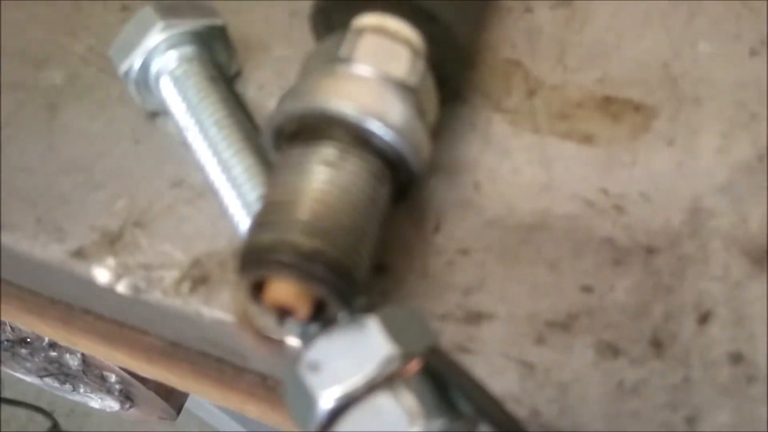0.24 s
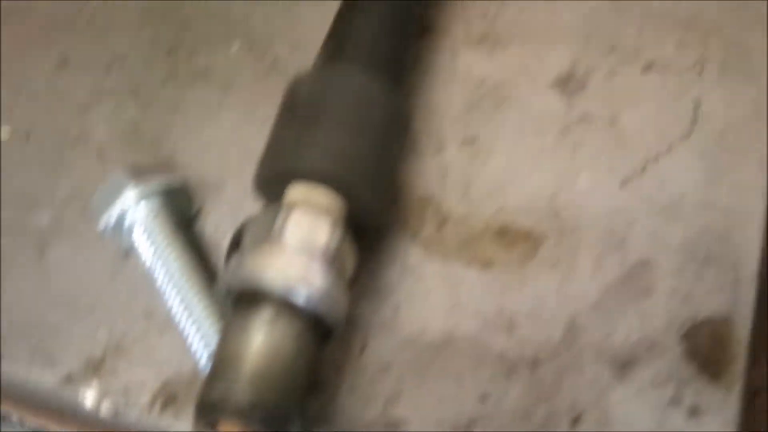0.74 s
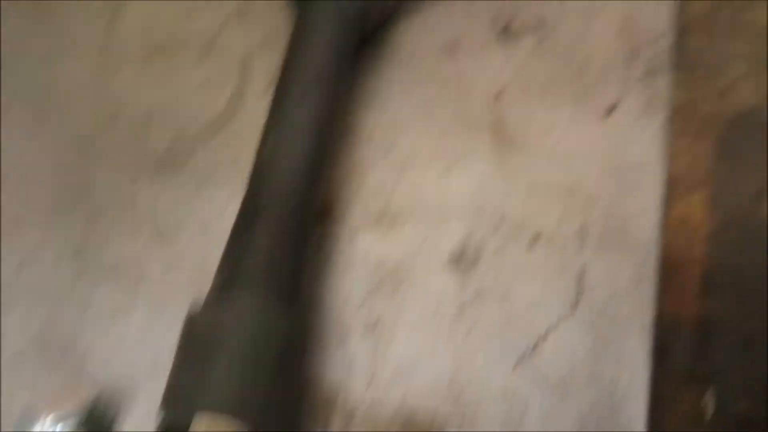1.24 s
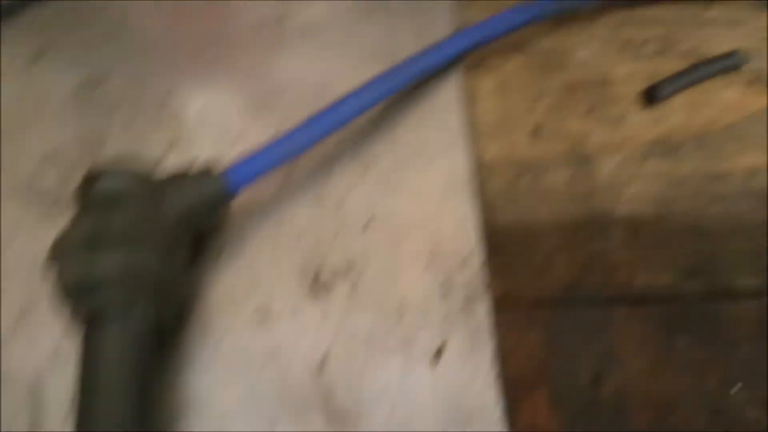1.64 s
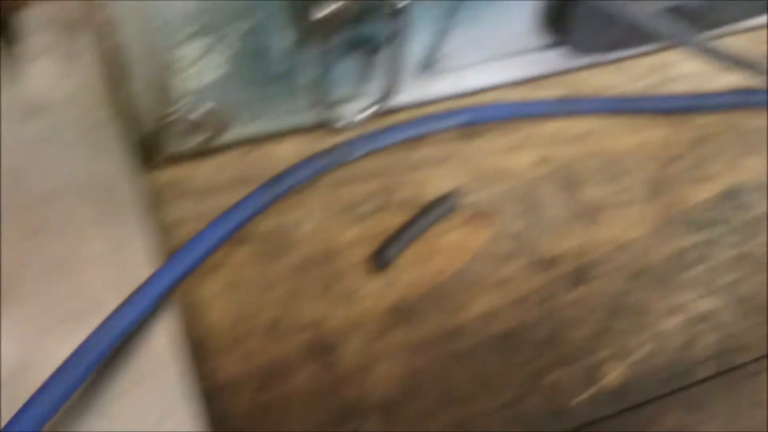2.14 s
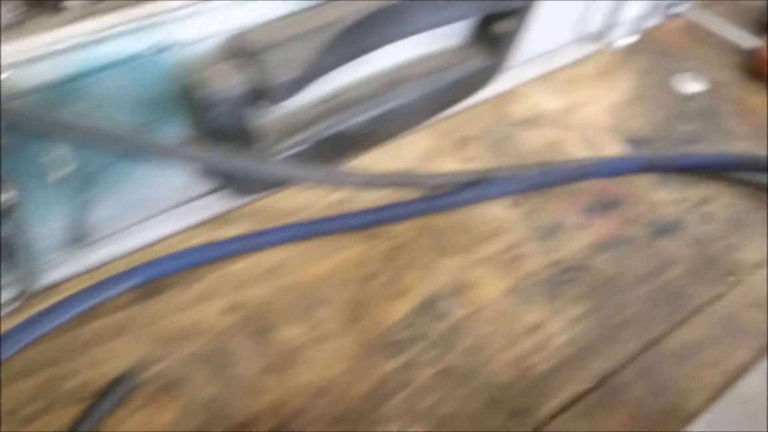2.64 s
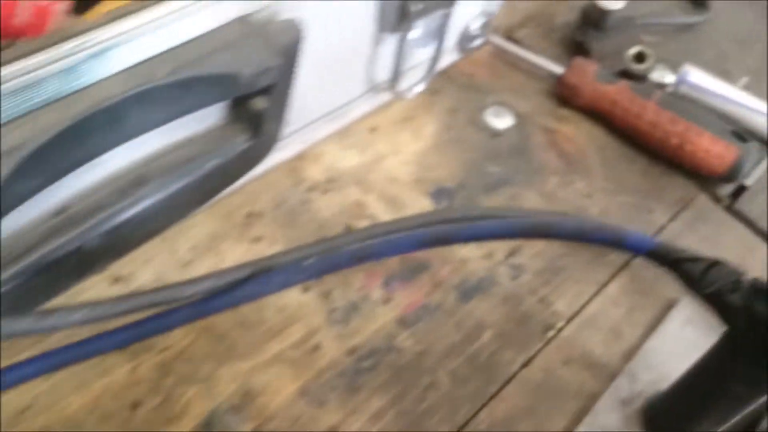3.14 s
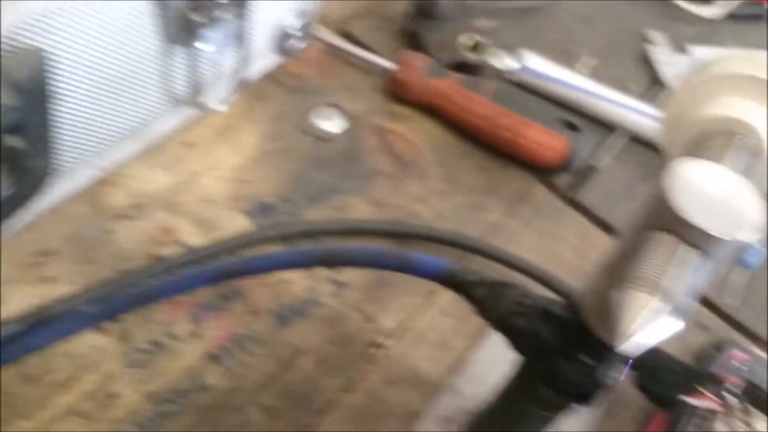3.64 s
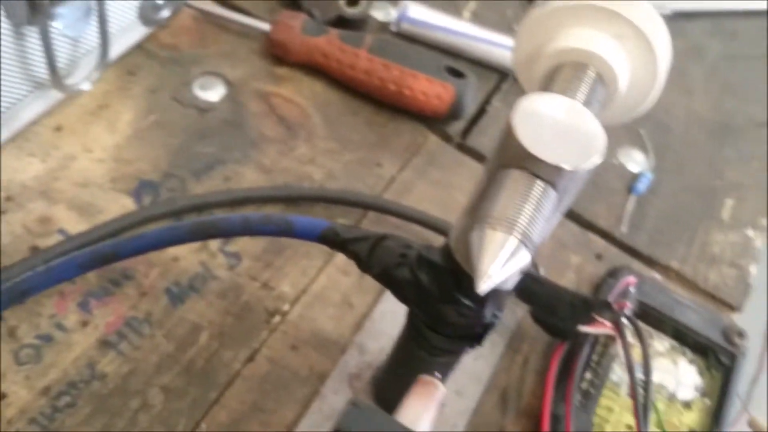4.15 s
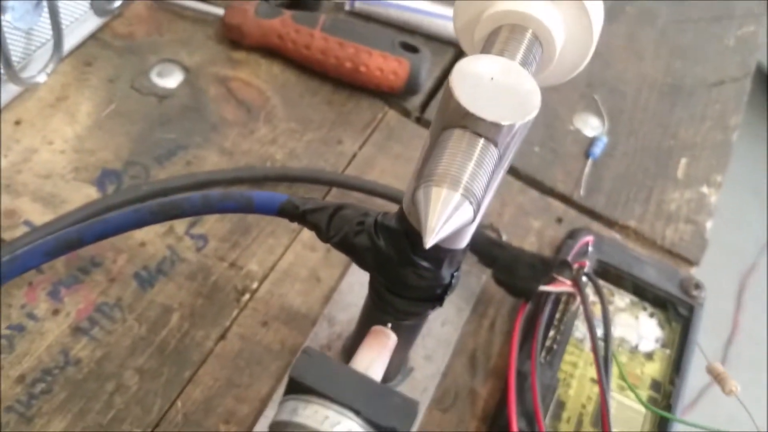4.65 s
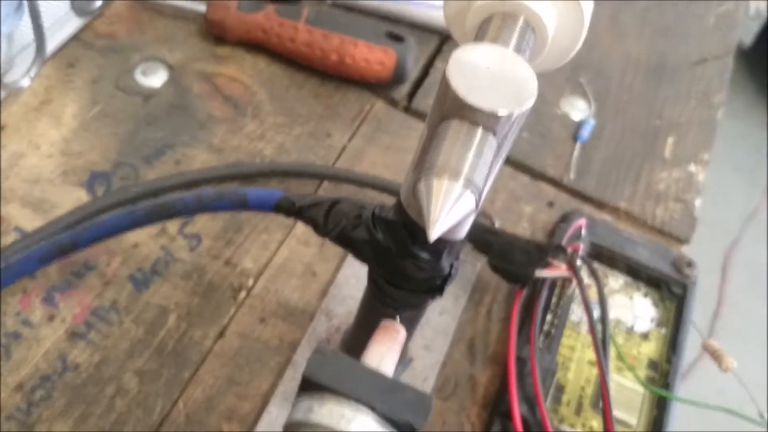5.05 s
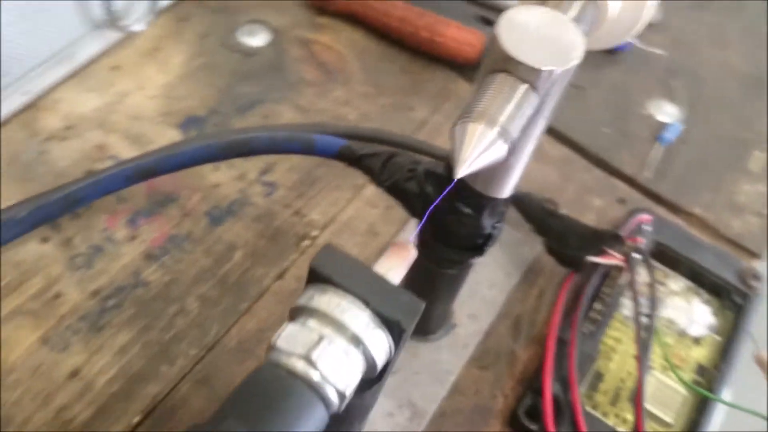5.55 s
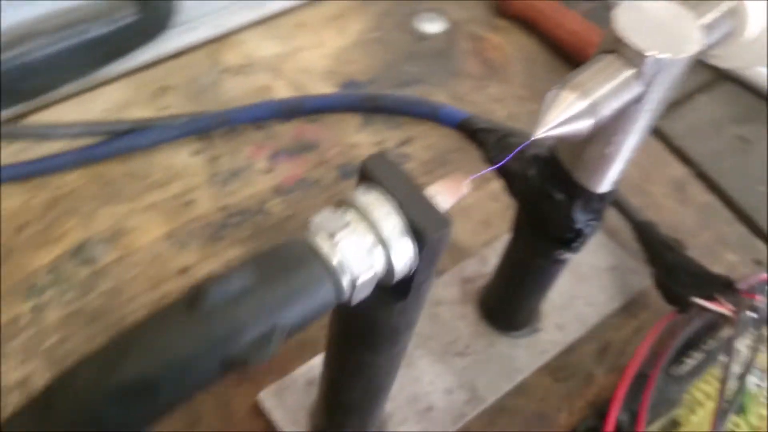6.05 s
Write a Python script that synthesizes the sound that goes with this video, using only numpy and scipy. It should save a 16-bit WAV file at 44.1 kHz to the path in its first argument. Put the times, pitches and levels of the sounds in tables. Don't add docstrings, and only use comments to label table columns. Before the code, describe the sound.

From 0 s an electric drill is already running at nearly constant speed: bright brush hiss, a soft midrange gearbox whir, low bench rumble and a very thin, high whine near 9.5 kHz. Over it, sharp electric sparks snap on a clock of about 26 a second, in short runs with skipped beats. Around 1.6 s the runs lengthen; the rumble swells briefly near 1.8 s as the hand shifts. Gear tones around 1.7 kHz and a faint chuck rattle surge irregularly, and the whine dips and swells, strong from 2.3 to 3.3 s. From 3.1 s the sparks are closer and harder, with a dense run from 3.7 to 4.1 s. Between 4.2 and 5.2 s only scattered snaps remain, exposing the drill. Dense cracking returns from 5.3 s, continuing with brief gaps to the cut-off at 6.3 s. Handheld stereo phone, tight bench echoes, clipped snaps, gritty treble.

```python
import sys
import numpy as np
from scipy import signal
from scipy.io import wavfile
from scipy.ndimage import uniform_filter1d, minimum_filter1d

SR = 44100
rng = np.random.default_rng(int(sys.argv[2]) if len(sys.argv) > 2 else 0)


def persist_wave(psi):
    counts = np.round(np.clip(psi, -1, 1) * 32767).astype(np.int16)
    wavfile.write(sys.argv[1], SR, np.atleast_2d(counts).T)


def decibels_to_gain(level_db):
    exponent = np.asarray(level_db, float) / 20
    return 10 ** exponent


N = 277389
TIME = np.arange(N) / SR

# time in seconds, commutator frequency in Hz.
MOTOR_SPEED = [(0, 9485), (0.7, 9462), (1.32, 9465), (1.99, 9441), (2.48, 9454), (2.7, 9466), (3.8, 9470),
               (4.25, 9491), (4.63, 9477), (5.46, 9484), (5.65, 9475), (5.96, 9483), (6.29, 9479)]
# time in seconds, drill level in dB, brush hiss left minus right in dB,
# spark left minus right in dB.
PHONE_PATH = [(0.0, -35.5, 8.5, 3), (0.31, -35.5, 9, 2), (0.81, -35, 6.5, 4), (1.33, -36, 11.5, 3.5),
              (1.58, -33, 7, 4), (2.01, -33.5, 9, 1), (2.26, -35, 15, 4), (2.61, -37, 9, 6),
              (2.94, -35.5, 11.5, 0), (3.28, -38, 8, 7.5), (3.54, -40, 13.5, 2), (3.85, -36.5, 10, 4),
              (4.1, -38, 9.5, 7), (4.62, -37, 10.5, 10), (4.92, -41.5, 10.5, 4), (5.54, -36, 10, 10),
              (5.9, -39.5, 5, 11), (6.17, -37, 4, 9)]

# frequency in Hz, density in dB.
GEARBOX_ROAR = [(300, -29), (500, -5), (750, 3.5), (1100, 5.5), (1350, 2), (1700, 6), (2050, -2.5),
                (2600, -21), (4000, -53.5)]
BRUSH_HISS = [(1500, -10), (2600, -2), (4300, -2), (5000, -2.5), (7000, 0), (8000, 1), (10500, 2),
              (12000, -7.5), (13000, -3), (15600, -15), (16000, -74)]
BENCH_RUMBLE = [(30, -15), (60, -5), (130, -13.5), (280, 0), (420, 0.5), (600, -5.5), (900, -16.5)]
SPARK_SNAP = [(300, -30), (1000, -14), (2500, -10), (5500, -8), (7500, -1), (10500, 2), (12500, -2),
              (15500, -3), (16800, -6), (18000, -40)]
# frequency in Hz, density in dB.
BENCH_CRACK = [
    [(800, -22), (1500, -6), (2200, 1.5), (3200, -5), (5000, -4), (6500, -20), (9000, -40)],
    [(800, -25), (2000, -12), (2900, -12), (3700, -4), (5200, 0), (6200, -5), (9000, -40)],
]

# frequency in Hz, level difference in dB.
PORT_LEVEL = [(180, 0), (280, 1.8), (700, 0), (1200, -3.5), (1800, -6.5), (2600, 0), (4300, 1.5),
              (5700, 4.5), (6700, 10), (8500, 8), (10800, 7.5), (12300, 0), (13300, -3), (15500, -8)]
# frequency in Hz, likeness from 0 to 1.
PORT_COHERENCE = [(70, 0.71), (170, 1), (800, 0.8), (1500, 0.19), (2500, 0.074), (5000, 0.15),
                  (15000, 0.044)]
# frequency in Hz, phase in radians.
PORT_PHASE = [(300, -3.5), (800, -2.5), (1500, -1.5), (2500, -0.28), (15000, 5)]
SWING_SPAN = (1.6, 2.6)
# frequency in Hz, change in dB.
SWING_CHANGE = [(2000, 0), (3500, -2), (5300, -3), (7000, 0.5), (8500, 3), (11000, 1), (13000, 0)]

# middle in seconds, half length in seconds,
# extra level in dB.
GRIP_SHIFTS = [
    (0.9, 0.032, 6),
    (1.79, 0.13, 6.5),
    (3.743, 0.14, 4),
    (5.547, .12, 2.5),
    (6.054, 0.034, 5.5),
]
# frequency in Hz, line width in Hz.
SHAFT_TONES = [(140.6, 8), (242.7, 5), (283, 20), (360, 60), (485.6, 3), (627, 6), (680, 30), (728.4, 4),
               (818, 8), (970, 6), (1458, 10), (1506, 12), (1716, 12), (1894, 12)]
SHAFT_LEVELS = [-50.5, -46, -41, -42, -43, -44, -43, -40, -52, -39.5, -50, -43, -43.5, -48]
# gain as the phone travels, in dB per second.
SHAFT_FADES = [0, -2, 0, 0, -3.5, 0, -1, -.3, -1, -1.2, 0, .5, 0, -.5]
# middle in seconds, half length in seconds, lower gear tone in dB, upper
# gear tone in dB, chuck rattle in dB.
LOAD_SURGES = [(0.237, 0.16, -25.5, -39, -30.5), (0.02, .2, -50, -55, -31.5),
               (0.606, 0.44, -32.5, -46, -32), (0.93, 0.45, -29, -42, -35.5), (1.212, 0.062, -25, -30, -34),
               (1.465, 0.078, -25.5, -26.5, -31.5), (1.73, 0.27, -25, -34, -31.5),
               (2.324, .5, -31, -29.5, -38.5), (2.757, 0.23, -31.5, -84, -51), (3.006, 0.54, -41, -32, -50),
               (3.288, 0.41, -36, -34, -39), (3.674, 0.16, -32.5, -35.5, -38.5),
               (4.09, 0.95, -42, -36.5, -42), (4.743, 0.76, -48, -33, -41.5), (5.014, 0.22, -39, -47, -50),
               (5.264, 0.15, -53, -32, -46), (5.64, 0.37, -34, -32, -37), (6.095, 0.46, -37.5, -40, -46)]

# time in seconds, level in dB.
WHINE_LEVEL = [(0, -30), (0.38, -34), (0.6, -24.5), (0.88, -34), (1.35, -31), (1.62, -24.5), (1.9, -37),
               (2.13, -32), (2.35, -25.5), (2.65, -26), (3.15, -24.5), (3.55, -31), (3.85, -37), (4.2, -45),
               (4.6, -33), (5.5, -35), (5.97, -26), (6.29, -34.5)]
# middle in seconds,
# half length in seconds.
WHINE_NODES = [
    (0.804, 0.046),
    (1.518, 0.024),
    (1.72, 0.036),
    (1.993, 0.055),
    (2.455, 0.083),
    (2.776, 0.067),
    (3.433, 0.12),
    (3.97, 0.18),
    (5.788, 0.11),
]
# time in seconds, extra level in dB.
RIGHT_FACING = [
    (2.7, 0),
    (3.0, 5),
    (4.1, 6),
    (4.5, 0),
]

# first spark in seconds, number of sparks, magneto turns between them,
# peak in dB at the left port.
SPARK_RUNS = [(0.0216, 5, 1, -13.5), (0.252, 2, 1, -13), (0.3672, 2, 1, -14.5), (0.4824, 2, 1, -17),
              (0.5977, 3, 2, -13), (0.8286, 2, 1, -14.5), (0.944, 2, 1, -14.5), (1.0595, 3, 2, -13.5),
              (1.2903, 2, 1, -13.5), (1.4056, 4, 1, -11), (1.598, 8, 1, -12.5), (1.9447, 2, 1, -12),
              (2.0604, 7, 1, -11), (2.3685, 2, 1, -10.5), (2.484, 3, 1, -12), (2.6379, 5, 1, -10.5),
              (2.8686, 7, 1, -11.5), (3.1759, 4, 1, -8.5), (3.3682, 2, 1, -8.5), (3.5603, 3, 1, -9),
              (3.7142, 11, 1, -8.5), (4.175, 1, 1, -20), (4.2901, 3, 1, -9), (4.5202, 1, 1, -10.5),
              (4.6355, 1, 1, -12.5), (4.9427, 1, 1, -11), (5.2116, 1, 1, -11), (5.3267, 6, 1, -8.5),
              (5.5954, 13, 1, -9), (6.133, 4, 1, -10)]
# frequency in Hz, threshold in dB.
THRESHOLD = [(1800, -40), (2600, -5.5), (4300, -1.5), (4700, -9), (5800, -8), (8000, -20), (11500, -15),
             (12700, -4.5), (15600, -4), (15900, 22)]

HISS_DB, HISS_FOLLOWS = -31, 0.42
GEARS_IDLE_DB = -49.5
RIGHT_WHINE_DB, WHINE_DRIFT_DB, NODE_DEPTH = -37, 3, 0.78
LOWER_SIDEBAND_DB, UPPER_SIDEBAND_DB, SIDEBAND_FOLLOWS = -36, -34, 0.4
BARS_PER_SPARK = 364
SNAP_SPREAD_DB, PORT_SPREAD_DB, CRACK_SPREAD_DB = 1.0, 1.0, 1.8
CRACK_FAR_DB, CRACK_CLOSE_DB = -12.5, -14.5
BURST = 1400
BAND_EDGE_HZ = 16600
RAISE_SHARE = 0.35


def read(points, hz):
    f, value = np.transpose(points)
    return np.interp(np.log(hz + 1), np.log(f + 1), value)


def curves(rows):
    s, *columns = np.transpose(rows)
    return [np.interp(TIME, s, column) for column in columns]


def evened(x):
    return x / np.sqrt(np.mean(abs(x) ** 2) + 1e-20)


def turns():
    return 2 * np.pi * np.cumsum(curves(MOTOR_SPEED)[0]) / SR


def wash(spectrum, patchy_db, flicker_db):
    frames, hz = N // 128 + 5, np.fft.rfftfreq(512, 1 / SR)
    a, b, c, d, patches = rng.standard_normal((frames, 257, 5)).T
    flicker = evened(uniform_filter1d(patches[0], size=3))
    patches = uniform_filter1d(patches, size=5, axis=0)
    patches = evened(uniform_filter1d(patches, size=24, axis=1))

    same = np.clip(read(PORT_COHERENCE, hz), 0, 1)[:, None]
    right = a + 1j * b
    left = same * right + np.sqrt(1 - same ** 2) * (c + 1j * d)
    left = left * (decibels_to_gain(read(PORT_LEVEL, hz)) * np.exp(1j * read(PORT_PHASE, hz)))[:, None]
    swing = np.interp(np.arange(frames) * 128 / SR, SWING_SPAN, (-0.5, 0.5))
    right = right * decibels_to_gain(np.outer(read(SWING_CHANGE, hz), swing))

    density_db = read(spectrum, hz)[:, None] + patchy_db * patches + flicker_db * flicker
    z = np.array([left, right]) * decibels_to_gain(density_db)
    x = signal.istft(z, nperseg=512, noverlap=384)[1][:, :N]
    return x / np.sqrt(np.mean(x[1] ** 2))


def motor_noise():
    body_db, pan_db, _ = curves(PHONE_PATH)
    change_db = body_db - body_db.mean()
    roar = decibels_to_gain(body_db + 9.5) * wash(GEARBOX_ROAR, patchy_db=1.5, flicker_db=2.5)

    armature = turns() / 39
    throb = 1 + 0.073 * np.cos(armature) + 0.0095 * np.cos(armature / 5)
    pan = decibels_to_gain(np.outer([0.5, -0.5], pan_db - pan_db.mean()))
    hiss = wash(BRUSH_HISS, patchy_db=1.0, flicker_db=2.0)
    hiss = decibels_to_gain(HISS_DB + HISS_FOLLOWS * change_db) * pan * throb * hiss

    grip_db = sum(db * np.exp(-((TIME - s) / half) ** 2) for s, half, db in GRIP_SHIFTS)
    rumble = wash(BENCH_RUMBLE, patchy_db=1.5, flicker_db=0.6)
    rumble = decibels_to_gain(-34 + grip_db + 0.2 * change_db) * rumble
    return roar + hiss + rumble


def wander(width):
    coarse = TIME[::16]
    r = np.exp(-16 * np.pi * width / SR)
    noise = rng.standard_normal((2, len(coarse)))
    a, b = signal.lfilter([1], np.convolve([1, -r], [1, -r]), noise)
    return evened(np.interp(TIME, coarse, a) + 1j * np.interp(TIME, coarse, b))


def tone(hz, width, steady=0.62, own=0.24):
    right = (steady + wander(width)) / np.hypot(steady, 1)
    left = right + own * wander(width)
    left = left * decibels_to_gain(read(PORT_LEVEL, hz)) * np.exp(1j * read(PORT_PHASE, hz))
    carrier = np.exp(1j * turns() * hz / np.mean(MOTOR_SPEED, axis=0)[1])
    return np.sqrt(2) * (np.array([left, right]) * carrier).real


def surging():
    s, length, *db = np.transpose(LOAD_SURGES)
    coarse = TIME[::64]
    offset = np.clip((coarse - s[:, None]) / length[:, None], -1, 1)
    bells = np.cos(np.pi / 2 * offset) ** 4
    power = decibels_to_gain(GEARS_IDLE_DB) ** 2 + decibels_to_gain(np.array(db)) ** 2 @ bells
    return [np.interp(TIME, coarse, np.sqrt(p)) for p in power]


def gears():
    low, high, rattle = surging()
    later = TIME - 2.0
    out = np.zeros((2, N))
    for (hz, width), db, fade in zip(SHAFT_TONES, SHAFT_LEVELS, SHAFT_FADES):
        out += decibels_to_gain(db + fade * later) * tone(hz, width, steady=0.71)
    out += low * decibels_to_gain(3.5) * tone(1667, 35.5, steady=0.094)
    out += high * decibels_to_gain(2.0) * tone(1763, 31, steady=0.63)
    for hz in (4750, 4955):
        tilt_db = (hz - 4850) / 100 * (2.0 - 0.79 * TIME)
        fits = abs(wander(25.0)) ** 1.13
        out += rattle * decibels_to_gain(-6.5 + tilt_db) * fits * tone(hz, 118, steady=0, own=0.44)
    return out


def drift(per_s):
    hz, phase = np.geomspace(per_s / 8, per_s, num=12), rng.random(12)
    coarse = TIME[::256]
    waves = np.sin(2 * np.pi * (np.outer(coarse, hz) + phase))
    return np.interp(TIME, coarse, evened(waves.sum(axis=1)))


def whine():
    line_db = curves(WHINE_LEVEL)[0]
    nodes = [1 - NODE_DEPTH * np.exp(-((TIME - s) / half) ** 2) for s, half in WHINE_NODES]
    alive = np.prod(nodes, axis=0)
    phase = turns() + 0.2 * wander(30).real
    spindle = turns() / 195

    levels_db = (LOWER_SIDEBAND_DB, UPPER_SIDEBAND_DB, RIGHT_WHINE_DB)
    lower, upper, right = (decibels_to_gain(db + WHINE_DRIFT_DB * drift(per_s=5)) for db in levels_db)
    sides = upper * np.cos(phase + spindle) - lower * np.cos(phase - spindle)
    sides = sides * np.sqrt(alive) * decibels_to_gain(SIDEBAND_FOLLOWS * (line_db - line_db.mean()))

    left = decibels_to_gain(line_db + 6.5) * np.cos(phase) * alive + sides
    right = right * decibels_to_gain(curves(RIGHT_FACING)[0]) * np.sqrt(alive) * np.sin(phase)
    return np.sqrt(2) * np.array([left, right + decibels_to_gain(-9) * sides])


def firing():
    rows = []
    for first, count, step, db in SPARK_RUNS:
        period = step * BARS_PER_SPARK / np.interp(first, *np.transpose(MOTOR_SPEED))
        rows += [(first + k * period, db) for k in range(count)]
    s, db = np.transpose(rows)
    path = np.transpose(PHONE_PATH)
    a, b, c = rng.standard_normal((len(s), 3)).T
    left_db = db + SNAP_SPREAD_DB * (1 - a ** 2 / 2)
    right_db = left_db - np.interp(s, path[0], path[3]) + PORT_SPREAD_DB * b
    crack_db = left_db + np.interp(s, (3.1, 3.6), (CRACK_FAR_DB, CRACK_CLOSE_DB)) + CRACK_SPREAD_DB * c
    return s, left_db, right_db, crack_db


def colour(spectrum, port=None):
    hz = abs(np.fft.fftfreq(4096, 1 / SR))
    db = read(spectrum, hz)
    if port is not None:
        db = db + read(port, hz)
    response = np.exp(np.conj(signal.hilbert(np.log(decibels_to_gain(db)))))
    taps = np.fft.ifft(response).real[:1024]
    return taps / np.linalg.norm(taps)


def peaked(bursts, taps, size):
    x = signal.fftconvolve(bursts, taps[None], axes=1)[:, :bursts.shape[1]]
    power = uniform_filter1d(x ** 2, size=size, axis=1)
    return x / np.sqrt(power.max(axis=1, keepdims=True))


def reflections(s):
    t = np.arange(BURST) / SR
    places = rng.standard_normal((20, 2, BURST)) * (rng.random((20, 2, BURST)) < 0.3)
    fresh = rng.standard_normal((len(s), 2, BURST))
    place, share = np.divmod(3 * s, 1)
    place = place.astype(int)
    blend = (share * np.pi / 2)[:, None, None]
    pattern = places[place] * np.cos(blend) + places[place + 1] * np.sin(blend)

    rise = np.clip(t / np.array([[0.0009], [0.0001]]), 0.45, 1)
    near = decibels_to_gain(-60 * t / np.array([[0.010], [0.013]]))
    facing = np.clip(s - 1.5, 0.3, 1)[:, None, None]
    wall = decibels_to_gain(np.array([[-20], [-11]]) - 60 * (t - 0.0068) / 0.014)
    wall = facing * wall * (t > 0.0068)
    shed = decibels_to_gain(-27 - 60 * t / 0.07)
    return (pattern + 0.4 * fresh) * rise * np.sqrt(near ** 2 + wall ** 2 + shed ** 2)


def sparks():
    s, left_db, right_db, crack_db = firing()
    nearness = np.clip(2 * (s - 3.1), 0, 1)[:, None]
    bursts = reflections(s)
    bursts[:, 1, 3] += 3.0
    bursts[:, 0, 36] += 0.8
    bursts[:, 0, 3] += 2.2 * nearness[:, 0]

    left = peaked(bursts[:, 0], colour(SPARK_SNAP, PORT_LEVEL), size=24) * decibels_to_gain(left_db + 6.5)[:, None]
    right = peaked(bursts[:, 1], colour(SPARK_SNAP), size=16) * decibels_to_gain(right_db + 5)[:, None]
    far, close = (np.array([peaked(bursts[:, port], colour(c), size=36) for port in (0, 1)])
                  for c in BENCH_CRACK)
    crack = (1 - nearness) * far + nearness * close * decibels_to_gain([[[-1.5]], [[3.5]]])
    snaps = np.array([left, right]) + crack * decibels_to_gain(crack_db - 1.0)[:, None]

    out = np.zeros((2, N + BURST))
    for k, start in enumerate(np.round(s * SR).astype(int)):
        out[:, start:start + BURST] += snaps[:, k]
    return out[:, :N]


def scene():
    return motor_noise() + gears() + whine() + sparks()


def starved(x):
    hz, _, z = signal.stft(x, SR, nperseg=512, noverlap=384)
    frames = z.shape[2]
    usual = uniform_filter1d(np.median(abs(z), axis=2).max(axis=0), size=9)
    jumps_db = 5 * rng.standard_normal((frames // 8 + 1, 65))
    jumps_db = np.repeat(jumps_db, 4, axis=1)[:, :257]
    jumps_db = np.repeat(jumps_db, 8, axis=0)[:frames].T

    frame_db = 10 * np.log10((abs(z) ** 2).sum(axis=(0, 1)) + 1e-12)
    loudest_db = -minimum_filter1d(-frame_db, size=11)
    raise_db = RAISE_SHARE * np.maximum(loudest_db - np.median(frame_db), 0)

    threshold = (usual * decibels_to_gain(read(THRESHOLD, hz)))[:, None] * decibels_to_gain(jumps_db + raise_db)
    heard = uniform_filter1d(abs(z), size=4, axis=1) > threshold
    kept = heard & (hz < BAND_EDGE_HZ)[:, None]
    return signal.istft(z * kept, SR, nperseg=512, noverlap=384)[1][:, :N]


def roll_off(x):
    return signal.sosfilt(signal.butter(12, 16860, fs=SR, output="sos"), x)


def record(dry):
    clipped = np.clip(dry, -0.86, 0.86)
    mix = starved(clipped)
    return roll_off(mix)


dry = scene()
out = record(dry)
persist_wave(out)
```